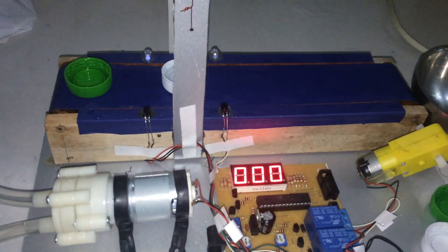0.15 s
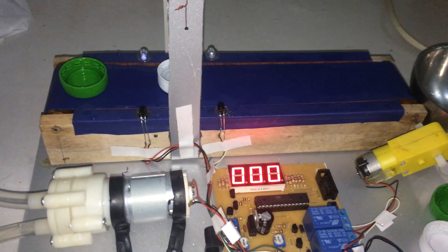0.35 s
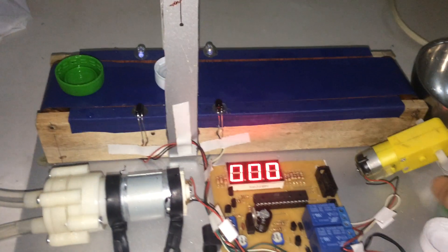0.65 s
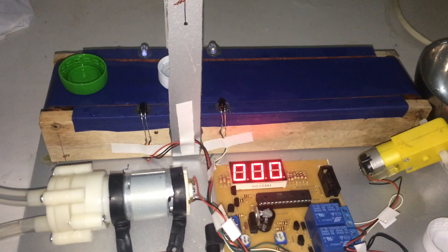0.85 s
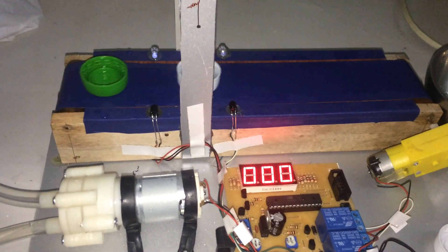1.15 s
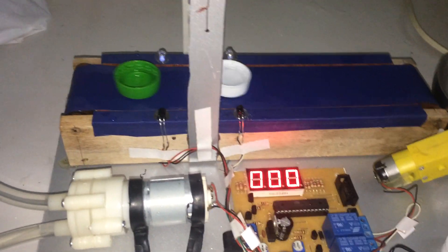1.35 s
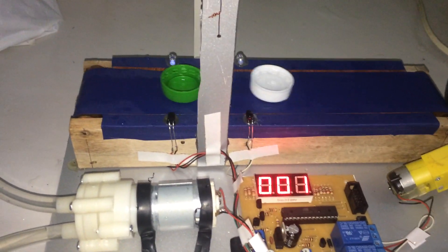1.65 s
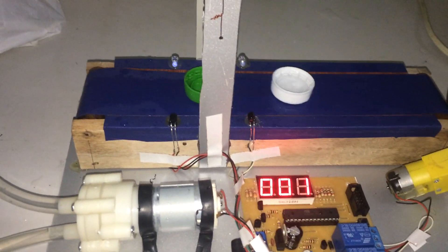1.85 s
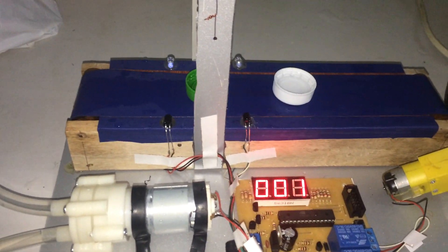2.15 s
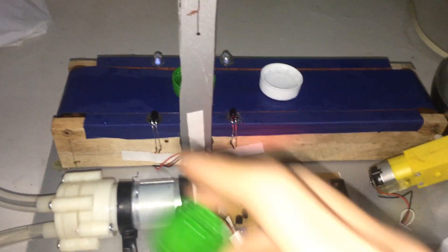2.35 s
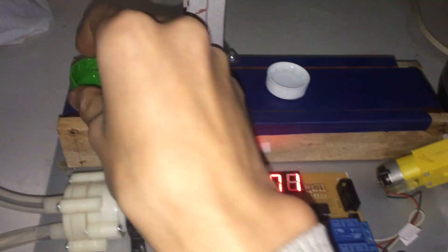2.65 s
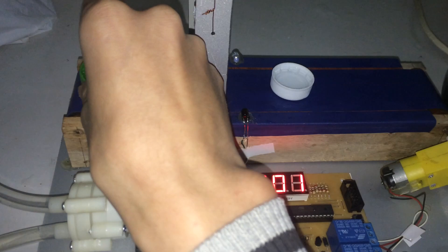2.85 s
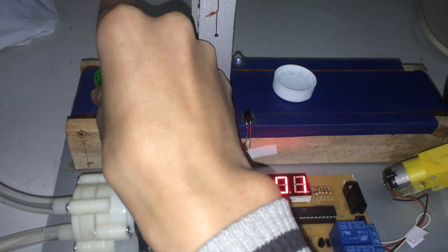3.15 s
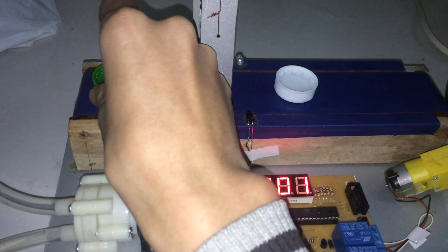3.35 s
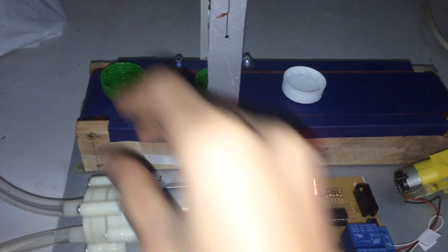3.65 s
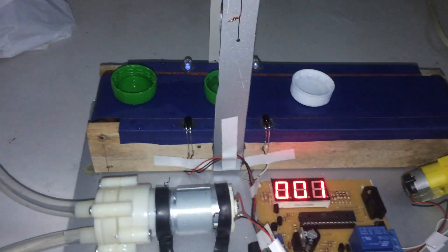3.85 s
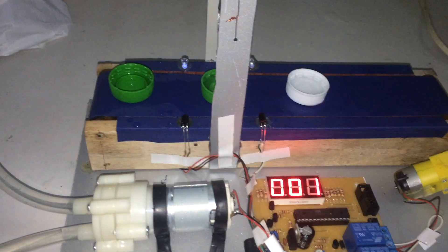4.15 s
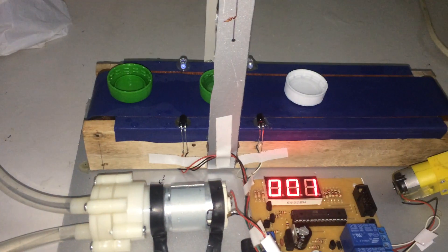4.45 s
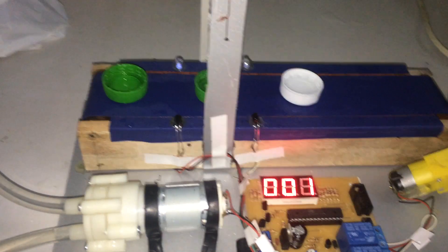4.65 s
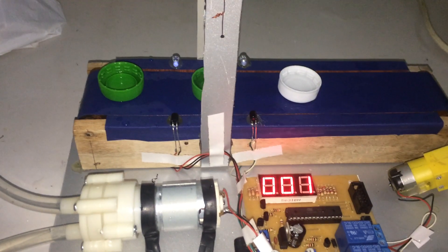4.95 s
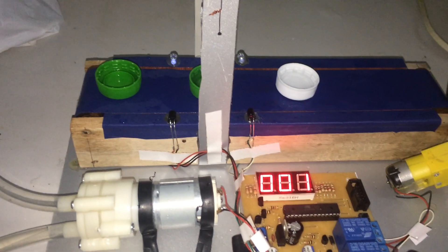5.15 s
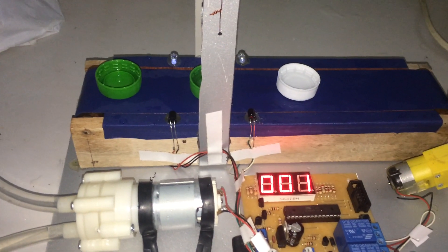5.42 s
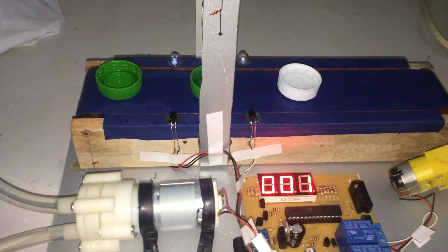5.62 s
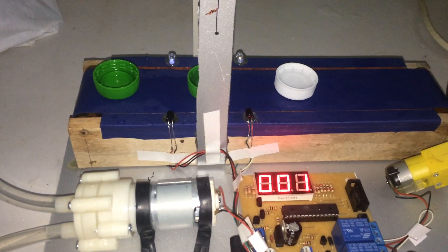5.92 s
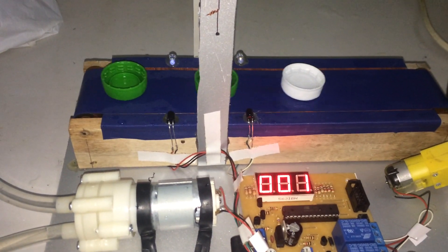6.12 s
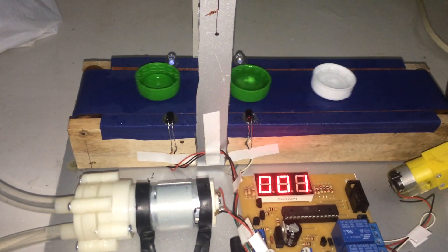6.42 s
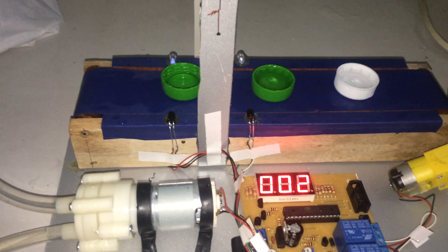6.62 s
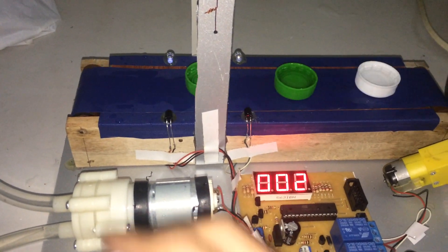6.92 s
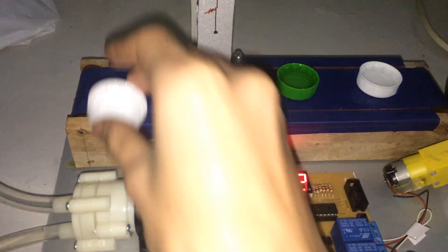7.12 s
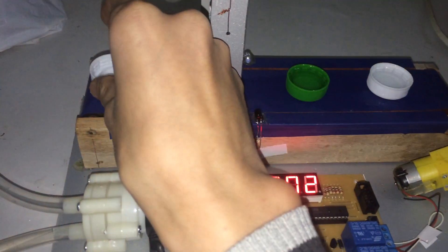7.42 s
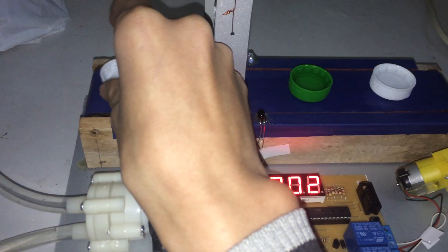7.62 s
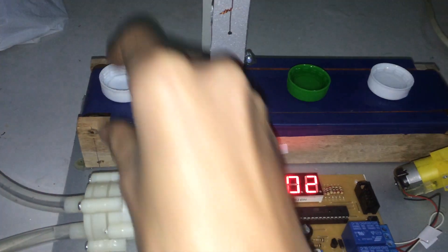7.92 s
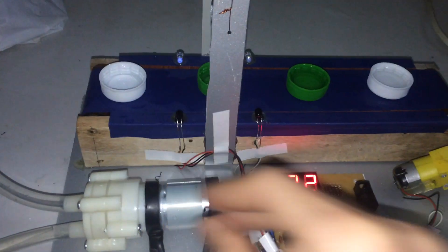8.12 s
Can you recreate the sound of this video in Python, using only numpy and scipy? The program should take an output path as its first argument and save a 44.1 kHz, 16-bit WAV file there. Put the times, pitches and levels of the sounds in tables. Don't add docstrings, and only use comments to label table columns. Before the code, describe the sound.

A small geared motor whirs in two short bursts with sharp relay clacks, while plastic caps tap and scuff in a quiet room.

```python
import sys
import numpy as np
from scipy import signal
from scipy.fft import rfft, irfft, next_fast_len
from scipy.io import wavfile
from scipy.ndimage import uniform_filter1d, map_coordinates

SR = 44100
rng = np.random.default_rng(int(sys.argv[2]) if len(sys.argv) > 2 else 0)


def output_pcm(signal):
    pcm = np.clip(np.atleast_2d(signal).T, -1, 1) * 32767
    wavfile.write(sys.argv[1], SR, np.round(pcm).astype(np.int16))


def level_to_linear(level):
    exponent = np.asarray(level, float) / 20
    return 10 ** exponent


N = 365059

# multiple of the shaft rate, level in dB.
ORDERS_DB = [(2, -14.5), (3, 0.5), (4, -4.5), (6, -13), (9, -10.5), (12, -10.5)]
# frequency in Hz, level in dB.
MOUNT = [(250, -25.5), (360, -19), (460, -19), (540, 1), (620, 6), (720, 2.5), (850, 5), (1050, -10),
         (1230, -8), (1400, -3), (2200, -14), (3000, -5)]
# frequency in Hz, width in Hz, level in dB.
FRAME = [(615, 71, 3.5), (721, 74, 1), (762, 63, 0)]
# frequency in Hz, width in Hz, level in dB.
GEARBOX = [(1019, 113, 0), (1138, 80, 0), (1197, 45.4, 4.5), (1624, 87, 1), (2006, 313, -2), (2152, 196, 2),
           (2350, 148.5, -1.5), (2493, 88, -1), (2700, 110, -5), (2867, 98, -4), (3016, 110, -3.5),
           (3600, 630, -11.5)]
# frequency in Hz, level in dB per Hz.
BRUSH = [(2470, -22.5), (4200, -9.5), (4780, -14), (5780, -5), (6760, -7), (7560, -0.5), (8500, -6),
         (9720, -1.5), (11200, -2.5), (12100, 1.5), (13400, -2.5), (15100, -6.5), (16000, -17)]
# time in seconds, running commutator rate in Hz, effort in dB, gear play in dB.
LOAD = [
    [(1.178, 547.8, 0, -2.5), (1.33, 549.7, 1, 3.5), (1.44, 542, 0.5, -3.5), (1.55, 549, -0.5, -1),
     (1.63, 545.5, -1.5, -6), (1.69, 531.7, 2, 3.5), (1.74, 531.7, 1.5, 2.5), (1.859, 518, 2, 2.5)],
    [(6.161, 543, 1, 2), (6.3, 545.6, 1.5, 2), (6.42, 545.2, -0.5, -1), (6.5, 532.2, 1, 0.5),
     (6.62, 514.7, 2.5, 3.5), (6.77, 538.1, -1, -0.5), (6.826, 554.4, 0, -0.5)],
]
COAST_S = [.325, .325]
FRAME_LAG_S = [0.021, 0.034]
# time in seconds, peak in dB.
BAR_TICKS = [(1.9214, -26), (1.935, -25), (1.9524, -27), (1.9714, -29), (2.0333, -39), (2.0464, -40),
             (2.0654, -45), (2.0864, -43), (2.1004, -43), (2.1114, -42.5), (6.8604, -29.5), (6.8634, -32),
             (6.8764, -30), (6.8867, -26), (6.9094, -27), (6.9252, -22.5), (6.9295, -28), (6.9511, -34),
             (6.9726, -32), (7.0179, -34.5), (7.0329, -37), (7.0444, -36), (7.0654, -47)]
# frequency in Hz, width in Hz, level in dB.
BAR_RING = [(7600, 1200, -8), (9700, 1300, -3.5), (13100, 1400, -1), (14600, 1200, -5)]

FULL_HZ = 540
START_GAP, SPIN_UP_S, SPIN_UP_SHAPE = .55, .055, 1.3
UNLOAD_S = 0.049
STALL_SPEED, STALL_DB = 0.24, -32.5
WHINE_DB, DRONE_DB, RATTLE_DB, CHATTER_DB, HISS_DB = -34.5, -32, -31.5, -34.5, -36.5
WHINE_GROWS, DRONE_GROWS, RATTLE_GROWS, CHATTER_GROWS, HISS_GROWS = 0.98, 0.29, 0.71, 0.25, 1.3
FREE_DRONE_DB, FREE_CHATTER_DB, FREE_RATTLE_DB, FREE_HISS_DB = -6, -1.5, -1.5, -5.5
DRONE_PER_EFFORT = 1.8
TIGHT_SINGS = .35

# time in seconds, peak in dB.
TOUCH = [
    (1.1728, -23),
    (6.1562, -20.5),
]
# time in seconds, peak in dB.
PULL = [
    (1.1752, -14),
    (2.2173, -14),
    (6.159, -12.5),
    (7.1835, -15),
]
# time in seconds, peak in dB, bounce after seconds, bounce in dB.
RELEASE = [
    (1.8586, -13, .005, -6),
    (6.8249, -14, .005, -8),
]
# time in seconds, peak in dB.
DROP = [
    (2.5751, -20.5),
    (7.5422, -21.5),
]
# frequency in Hz, width in Hz, level in dB.
PULL_RING = [(685, 710, -13), (1917, 420, -14), (2400, 190, -7.5), (2900, 273, -6.5), (3930, 580, -11.5),
             (5500, 1305, -10), (6540, 750, -4), (7930, 580, -1), (8470, 380, 1.5), (10580, 790, -6),
             (12320, 1500, -11.5), (14734, 2100, -18.5)]
# frequency in Hz, width in Hz, level in dB.
RELEASE_RING = [(4900, 670, -18.5), (7000, 980, -9), (9050, 455, 7), (10930, 760, -7), (13500, 1200, -6)]
# frequency in Hz, width in Hz, level in dB.
DROP_RING = [(1206, 400, -15), (2340, 180, -8.5), (3430, 160, -2), (5430, 870, -4), (7000, 1200, -8),
             (9100, 540, -0.5), (10460, 2300, -7), (14600, 930, -9)]
# frequency in Hz, width in Hz, level in dB.
BOARD = [(720, 66, 9), (1020, 210, -15)]

# time in seconds, peak in dB, ring in Hz.
SNAPS = [(3.411, -58, 9000), (3.7225, -53, 10500), (7.668, -56, 10280), (7.9372, -48, 4100),
         (7.7165, -50.5, 5670), (8.124, -56, 8000), (2.361, -51, 12000), (2.3937, -54, 7750),
         (2.4, -48, 8600), (2.446, -48.5, 9400), (2.4574, -46, 3300), (2.4962, -42.5, 11600),
         (2.676, -46, 10600), (2.92, -62, 4350), (3.0794, -57.5, 3013), (3.267, -64, 7500),
         (3.3211, -34.5, 3020), (3.4738, -52, 2260), (3.574, -36, 4950), (3.6796, -49, 3180),
         (4.67, -57, 8970), (4.9238, -36, 2240), (5.25, -58, 3900), (5.312, -57.5, 8980),
         (6.0893, -67.5, 2400), (6.148, -51, 7971), (7.174, -57, 7000), (7.4136, -51, 12240),
         (7.475, -58, 9030), (7.5815, -37, 10170), (7.7047, -52, 13000), (7.917, -58, 3120),
         (7.964, -49, 9500)]
# time in seconds, peak in dB, ring in Hz.
TAPS = [(2.459, -42.5, 5300), (2.6673, -52, 13000), (3.0278, -47, 2300), (3.0282, -49, 3320),
        (3.112, -61, 4260), (3.4185, -46, 2220), (3.537, -59, 3600), (3.579, -35, 6150),
        (3.7018, -47, 2900), (3.7016, -41, 6800), (3.721, -57, 2800), (3.756, -50.5, 9650),
        (3.7562, -58, 3007), (3.793, -59, 6080), (3.93, -43, 9400), (3.937, -33, 8750), (5.257, -58, 1820),
        (5.264, -57, 2510), (6.137, -60, 7996), (7.328, -60, 11900), (7.487, -50, 14100),
        (7.716, -41, 3540), (7.9368, -39.5, 5500), (7.939, -47, 2900), (7.9503, -51, 3038),
        (8.0635, -52, 8900), (8.0845, -43, 2130), (8.0906, -39, 7100), (8.124, -50, 2110),
        (8.263, -59, 3230)]
# time in seconds, peak in dB, ring in Hz.
ROCKS = [(2.735, -67, 4900), (3.032, -60.5, 2230), (3.325, -59.5, 3210), (3.41, -57.5, 2440),
         (3.44, -61, 2090), (3.58, -60, 4630), (8.09, -56, 2150), (8.127, -64, 2090)]
# time in seconds, peak in dB,
# ring in Hz.
THUDS = [(.777, -41, 1000), (.8295, -36.5, 970), (2.147, -39, 1151), (4.926, -51, 1040),
         (7.012, -27.5, 1120)]
# ticks, bright snap in dB, contact in seconds, cycles of ring,
# width over pitch, echo in dB, echo narrowness, roll-off over pitch.
KINDS = [
    (SNAPS, -1.1, 0.0032, 29, 0.13, -27, 1, 8.9),
    (TAPS, -35, 0.0063, 34, 0.078, -32, 0.94, 3.4),
    (ROCKS, -33, 0.22, 30, 0.034, -38, 1.4, 1.8),
    (THUDS, -32, 0.045, 41, 0.11, -22, 1.4, 1.1),
]
# start in seconds, top in seconds, end in seconds, level in dB, fizz over it in dB.
STROKES = [(.324, .337, .352, -60, -20), (.705, .756, .776, -42.5, -22), (.826, .836, .866, -48, -33),
           (.678, .71, .9, -55, -24), (5.22, 5.255, 5.29, -64, -14)]
# frequency in Hz, level in dB per Hz.
BENCH = [(250, -65), (480, 5), (970, 10), (1300, 4), (1850, 8.5), (2250, -4), (2850, 2.5), (3500, -1),
         (4200, -15), (4800, -28), (8000, -60)]
STROKE_DEPTH_DB = 58

# middle in seconds, length in seconds, whoosh in dB, rustle in dB.
MOVES = [(.9, 0.99, -80, -85), (2.47, 0.65, -67.5, -70), (3.496, 0.52, -81, -89.5),
         (7.449, 0.65, -70, -70.5), (8.029, 0.26, -78, -76)]
# whoosh in dB, rustle in dB.
STILL_DB = (-67.5, -92.5)
# frequency in Hz, level in dB per Hz.
SLEEVE = [(300, -36.5), (450, -9), (800, 2.5), (1100, -5.5), (1900, -12.5), (2600, -35), (5000, -82)]
# frequency in Hz, level in dB per Hz.
CLOTH = [(800, -61.5), (1500, 12), (3000, 2), (6000, -2), (12000, -9.5), (16000, -11)]

# frequency in Hz, time to fall 60 dB in seconds.
ROOM = [(300, 0.58), (3000, 0.25), (12000, 0.087)]
# frequency in Hz, level in dB per Hz.
RUMBLE = [(12, -69.5), (20, -43.5), (48, -7.5), (70, 0), (91, -12), (110, -7), (140, -34), (240, -120)]
# frequency in Hz, level in dB per Hz.
DRONE = [(53, -33), (90, -9.5), (119, 2), (150, -3), (199, -2), (280, -33), (360, -32.5), (620, -120)]
# middle in seconds, length in seconds, rumble swell in dB, drone swell in dB.
PASSES = [(0.343, 0.78, 7, 4), (1.4, 1.1, 1, 2.5), (4.193, 1.34, 5, 1.5), (6.412, 0.97, 2, 2),
          (7.805, 2, -1, 5)]
# middle in seconds, length in seconds, pitch in Hz, level in dB.
FAR_TONES = [(.4, .7, 500, -69), (2.98, .9, 353, -66), (5.1, .6, 440, -74), (6, .3, 850, -78),
             (8.1, .2, 120, -56), (8.21, .06, 3150, -80), (4.2, .9, 61, -57)]
# frequency in Hz, level in dB per Hz.
HUSH = [(150, -35), (250, 3), (401, -5.5), (438, -1), (478, -6), (900, -13), (1110, -16), (1300, -21.5),
        (2230, -24.5), (2850, -28), (4570, -32.5), (15000, -35.5), (16400, -48)]
# middle in seconds, length in seconds, level in dB.
CRICKET = [(4.52, .18, -84.5), (4.78, 0.12, -84), (5.08, 0.066, -80), (5.46, .12, -82), (5.83, .07, -84),
           (5.97, .04, -85)]
RUMBLE_DB, DRONE_FAR_DB, HUSH_DB = -61, -57, -61


def motor():
    run_hz, effort_db, play_db = curves(LOAD)
    speed, free, frame_free, on = shaft()
    bar_hz = run_hz * speed
    speed_db = 20 * np.log10(bar_hz / FULL_HZ)
    stall_db = STALL_DB * np.clip(1 - speed / STALL_SPEED, 0, 1)
    driven, frame_driven = 1 - free, 1 - frame_free

    whine_db = WHINE_DB + WHINE_GROWS * speed_db - TIGHT_SINGS * np.clip(play_db, -6, 3) * driven
    drone_db = DRONE_DB + DRONE_GROWS * speed_db + stall_db
    drone_db = drone_db + DRONE_PER_EFFORT * effort_db * frame_driven + FREE_DRONE_DB * frame_free
    rattle_db = RATTLE_DB + RATTLE_GROWS * speed_db + stall_db
    rattle_db = rattle_db + effort_db * driven + FREE_RATTLE_DB * free
    chatter_db = CHATTER_DB + CHATTER_GROWS * speed_db + stall_db
    chatter_db = chatter_db + play_db * driven + FREE_CHATTER_DB * free
    hiss_db = HISS_DB + HISS_GROWS * speed_db + FREE_HISS_DB * free + stall_db

    turns = np.cumsum(bar_hz / 3 * on * (1 + .003 * wobble(40))) / SR
    whine = 0
    for k, db in ORDERS_DB:
        order_db = db + along(MOUNT, k * bar_hz / 3) + .5 * k * wobble(10 * k)
        whine = whine + level_to_linear(order_db) * np.sin(2 * np.pi * (k * turns + rng.random()))
    runout = 1 + 0.17 * np.cos(2 * np.pi * turns)
    tooth_knocks = unit(knocks(turns, per_turn=8, scatter=.6, spread_db=1.0))
    teeth = patchy(runout * (tooth_knocks + 0.91 * rng.standard_normal(N)), depth_db=2.5)

    frame = filtered(resonant(teeth, FRAME, low_hz=509), lambda hz: 1 - 1 / (1 + (hz / 490) ** 8))
    drone = level_to_linear(drone_db) * steady(frame, on)
    bench = resonant(teeth, [(323, 33, 0)], low_hz=249.58)
    drone = drone + level_to_linear(drone_db - 27.5) * steady(bench, on)

    def rattle_band(hz):
        dip = 1 - 0.39 / (1 + ((hz - 3260) / 130) ** 2)
        return dip / (1 + (hz / 4150) ** 16)

    upper_gearbox = filtered(resonant(teeth, GEARBOX[3:], low_hz=1473), rattle_band)
    rattle = level_to_linear(rattle_db) * steady(upper_gearbox, on)
    lower_gearbox = resonant(teeth, GEARBOX[:3], low_hz=882)
    lower_gearbox = filtered(lower_gearbox, lambda hz: 1 / (1 + (hz / 1330) ** 12))
    chatter = level_to_linear(chatter_db) * steady(lower_gearbox, on)

    bar_hits = np.abs(knocks(turns, per_turn=4.6, scatter=0.089, spread_db=3))
    bars = np.convolve(bar_hits, level_to_linear(-60 * np.arange(400) / SR / 0.012))[:N]
    scrape = (0.51 * np.clip(bar_hz / 540, .1, 1) + 0.48 * bars) * runout
    hiss = level_to_linear(hiss_db) * steady(scrape * noise(BRUSH), on)
    return np.sqrt(2) * level_to_linear(whine_db) * on * whine + drone + rattle + chatter + hiss


def shaft():
    t = np.arange(N) / SR
    run = (t > LOAD[1][0][0] - 1) * 1
    on_s = np.array([rows[0][0] for rows in LOAD])[run]
    off_s = np.array([rows[-1][0] for rows in LOAD])[run]
    coast_s, lag_s = np.array(COAST_S)[run], np.array(FRAME_LAG_S)[run]
    up = 1 - START_GAP * np.exp(-(np.clip(t - on_s, 0, None) / SPIN_UP_S) ** SPIN_UP_SHAPE)
    down = np.clip(1 - (t - off_s) / coast_s, .01, 1)
    free = np.clip((t - off_s) / UNLOAD_S, 0, 1)
    frame_free = np.clip((t - off_s - lag_s) / UNLOAD_S, 0, 1)
    turning = (t > on_s) * (t < off_s + coast_s) * 1.
    return up * down, free, frame_free, uniform_filter1d(turning, size=64)


def knocks(turns, per_turn, scatter, spread_db):
    count = np.floor(turns * per_turn + scatter * wobble(900))
    hit = np.diff(np.maximum.accumulate(count), prepend=0) > 0
    return hit * level_to_linear(spread_db * rng.standard_normal(N)) * np.sign(rng.standard_normal(N))


def bar_ticks():
    out = np.zeros(N + SR)
    for s, db in BAR_TICKS:
        add(out, s, db - 2.0, BAR_RING, t60=0.009, rise=.0001)
    return out[:N]


def relays():
    out = np.zeros(N + SR)
    for s, db in TOUCH:
        add(out, s, db, PULL_RING[3:], t60=0.0078, rise=.0001)
    for s, db in PULL:
        add(out, s, db, PULL_RING, t60=0.011, rise=.0008, tail_db=-34.5, blur=0.81, size=16384)
        add(out, s + 0.0015, db - 8.5, PULL_RING, t60=0.012, rise=0.00033)
    for s, db, after_s, bounce_db in RELEASE:
        add(out, s, db, RELEASE_RING, t60=0.009, rise=0.0005, tail_db=-31.5, blur=0.38, size=16384)
        add(out, s + after_s, db + bounce_db, DROP_RING, t60=0.02, rise=0.00015)
    for s, db in DROP:
        add(out, s, db, DROP_RING, t60=0.015, rise=0.0005, tail_db=-32.0, blur=0.38, size=16384)
        add(out, s + 0.0022, db - 8.5, DROP_RING[2:], t60=0.022, rise=0.00032)
        add(out, s + 0.0011, db - 15.5, BOARD, t60=0.0029, rise=0.00011)
        add(out, s + 0.00607, db - 11, BOARD, t60=0.00386, rise=0.00041)
    return out[:N]


def caps():
    out = np.zeros(N + SR)
    for ticks, snap_db, contact_s, cycles, width, echo_db, blur, roll_off in KINDS:
        for s, db, hz in ticks:
            modes = [(hz, width * hz, 0), (4200, 1800, snap_db - 12.5), (7500, 3000, snap_db - 14.0)]
            t60 = np.clip(contact_s + cycles / hz, .003, .4)
            add(out, s, db, modes, t60, rise=.0001, tail_db=echo_db, blur=blur, soft=roll_off * hz)
    return out[:N]


def scuffs():
    t = np.arange(N) / SR
    grit = level_to_linear(0.83 * wobble(340))
    scrape = noise(BENCH)
    fizz = noise([(4000, -30), (5000, -19.0), (6300, -5), (7800, -3), (10000, -15), (14000, -18)])
    strokes = 0
    for start, top, end, db, fizz_db in STROKES:
        away = np.maximum((top - t) / (top - start), (t - top) / (end - top))
        strokes = strokes + level_to_linear(db - STROKE_DEPTH_DB * away ** 4) * (scrape + level_to_linear(fizz_db) * fizz)
    return unit(grit) * strokes


def sleeve():
    moving = sum(np.outer(level_to_linear(db), bump(s, length)) for s, length, *db in MOVES)
    whoosh, rustle = level_to_linear(STILL_DB)[:, None] + moving
    return whoosh * level_to_linear(1.1 * wobble(25)) * noise(SLEEVE) + rustle * level_to_linear(2.9 * wobble(250)) * noise(CLOTH)


def room(x):
    hz, t, z = signal.stft(rng.standard_normal(SR // 2), SR, nperseg=256)
    tail = signal.istft(z * level_to_linear(-60 * t / along(ROOM, hz)[:, None]), SR, nperseg=256)[1]
    return signal.fftconvolve(np.pad(x, (250, 0)), tail / np.linalg.norm(tail))[:N]


def air():
    rumble_db, drone_db = sum(np.outer(swell_db, bump(s, length)) for s, length, *swell_db in PASSES)
    rumble_db = RUMBLE_DB + rumble_db + 4.5 + 0.99 * wobble(4.6)
    drone_db = DRONE_FAR_DB + drone_db + 1 + 1.3 * wobble(4)
    rumble = level_to_linear(rumble_db) * steady(noise(RUMBLE), 1, size=SR // 2)
    drone = level_to_linear(drone_db) * steady(noise(DRONE), 1, size=SR // 2)
    hush = level_to_linear(HUSH_DB + 0.45 * wobble(5.3)) * unit(patchy(noise(HUSH), depth_db=1.5))
    return rumble + drone + swells(FAR_TONES, drift=14) + hush


def cricket():
    return swells([(s, length, 2865, db) for s, length, db in CRICKET], drift=50)


def swells(rows, drift):
    t = np.arange(N) / SR
    waver, slip = level_to_linear(2.5 * wobble(drift)), 0.97 * wobble(drift)
    tones = 0
    for s, length, hz, db in rows:
        tones = tones + level_to_linear(db) * bump(s, length) * np.sin(2 * np.pi * hz * t + slip)
    return waver * tones


def add(out, s, db, modes, t60, rise, tail_db=-120, blur=1, size=8192, soft=np.inf):
    t, hz = np.arange(size) / SR, np.fft.rfftfreq(size, 1 / SR)
    chatter = level_to_linear(-60 * t / t60) * (1 - np.exp(-t / rise)) * rng.standard_normal(size)
    chatter[int(rise * SR)] += 3
    response = body(hz, modes) / (1 + 1j * hz / 9000) / (1 + 1j * hz / soft) ** 2
    blow = irfft(rfft(chatter) * response, size)
    diffuse = irfft(rfft(rng.standard_normal(size)) * np.abs(response) ** blur, size)
    fade = (1 - np.exp(-t / 0.0016)) * (1 - t / t[-1])
    tail = level_to_linear(tail_db - 60 * t / 0.35) * fade * unit(diffuse)
    out[round(s * SR):][:size] += level_to_linear(db) * (blow / np.max(np.abs(blow)) + tail)


def body(f, modes):
    total = 0
    for k, (c, w, db) in enumerate(modes):
        total = total + (-1) ** k * level_to_linear(db) * 1j * f * w / (c * c - f * f + 1j * f * w + 1e-9)
    return total


def resonant(x, modes, low_hz):
    cut = lambda f: (f * f / (low_hz ** 2 - f * f + 1j * f * low_hz)) ** 2
    return filtered(x, lambda f: body(f, modes) * cut(f))


def patchy(x, depth_db):
    z = signal.stft(x, nperseg=1024)[2]
    field = uniform_filter1d(rng.standard_normal(z.shape), size=3, axis=0)
    field = uniform_filter1d(field, size=6, axis=1)
    return signal.istft(z * level_to_linear(depth_db * unit(field)), nperseg=1024)[1][:N]


def noise(spectrum):
    return unit(filtered(rng.standard_normal(N), lambda hz: level_to_linear(along(spectrum, hz))))


def filtered(x, response):
    m = next_fast_len(N + SR // 2)
    return irfft(rfft(x, m) * response(np.fft.rfftfreq(m, 1 / SR)), m)[:N]


def steady(x, on, size=SR // 12):
    return on * x / np.sqrt(np.abs(uniform_filter1d(x * x, size=size)) + 1e-12)


def unit(x):
    return x / np.sqrt(np.mean(x ** 2) + 1e-20)


def along(points, hz):
    f, v = np.transpose(points)
    return np.interp(np.log(hz + 1), np.log(f + 1), v)


def curves(tables):
    s, *cols = np.transpose(np.vstack(tables))
    return [np.interp(np.arange(N) / SR, s, c) for c in cols]


def wobble(rate):
    return map_coordinates(rng.standard_normal(int(N * rate / SR) + 4), [np.arange(N) * rate / SR])


def bump(s, length):
    return np.exp(-np.square(np.square(2 * (np.arange(N) / SR - s) / length)))


def scene():
    notch = lambda f: (4760 ** 2 - f * f + 1j * f * 220) / (4760 ** 2 - f * f + 1j * f * 500)
    drive = filtered(motor(), notch)
    machine = drive + level_to_linear(-14.5) * room(drive) + bar_ticks() + relays()
    hand = caps() + scuffs() + sleeve()
    return (machine + hand + air() + cricket())[None]


def low_pass(x):
    return signal.sosfilt(signal.butter(12, 16830, fs=SR, output="sos"), x)


def record(dry):
    heard = filtered(dry[0], lambda hz: 1 / (1 + (hz / 15800) ** 90))
    return low_pass(heard[None])


dry = scene()
out = record(dry)
output_pcm(out)
```